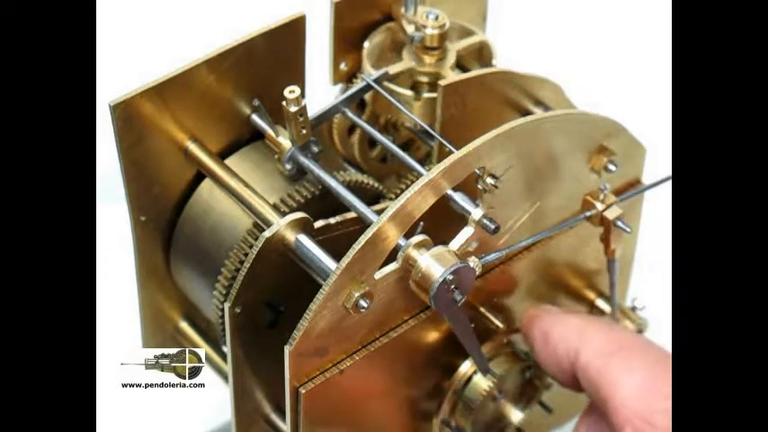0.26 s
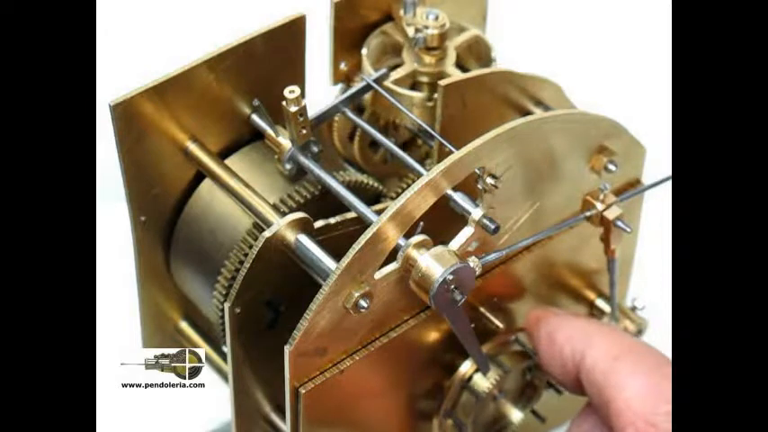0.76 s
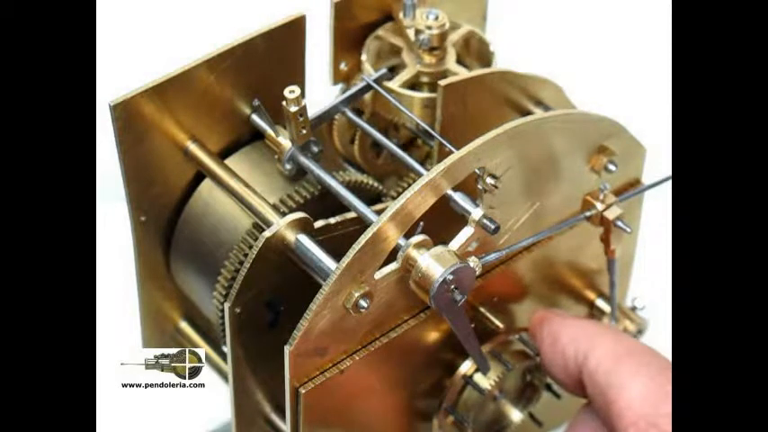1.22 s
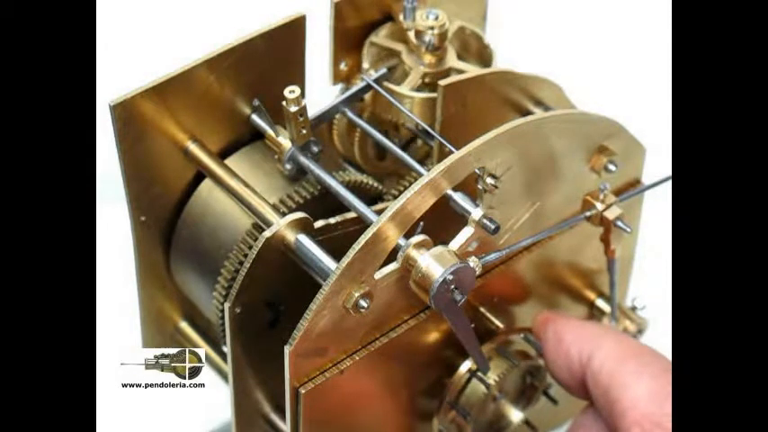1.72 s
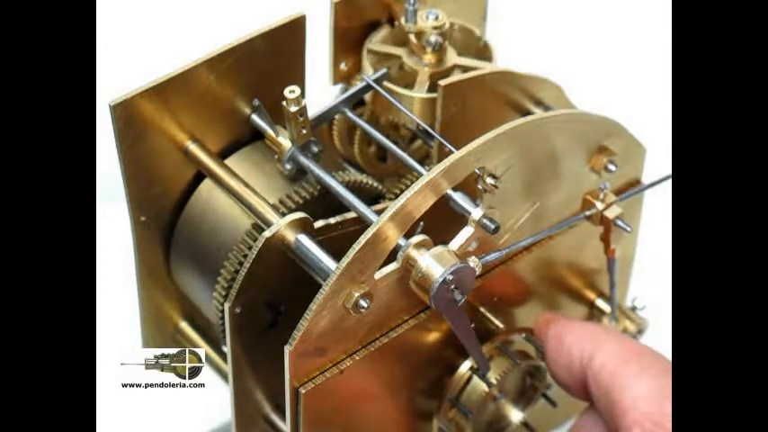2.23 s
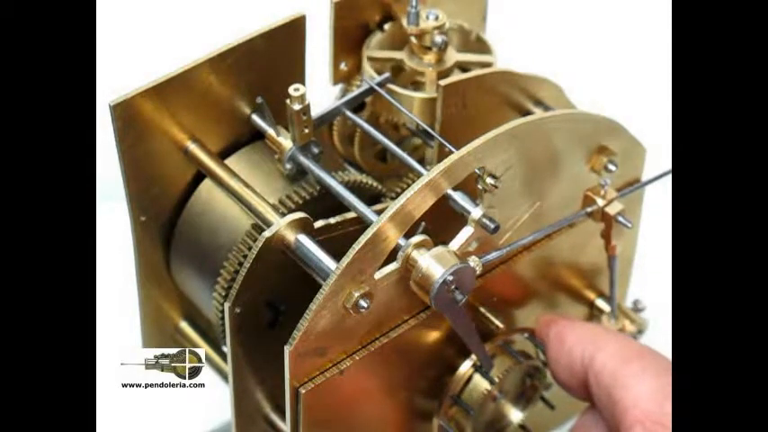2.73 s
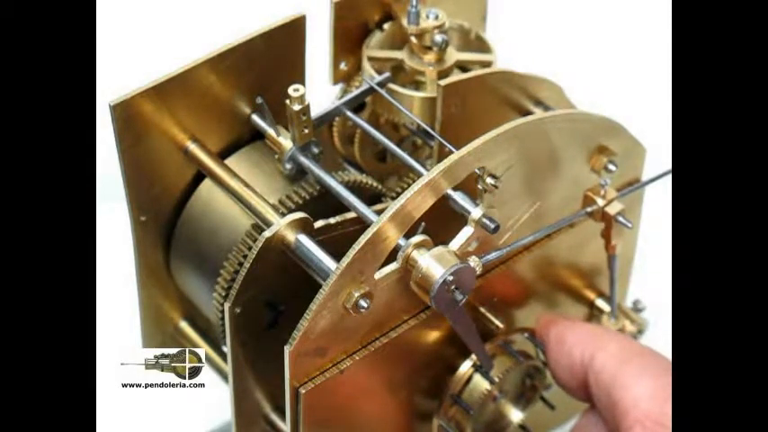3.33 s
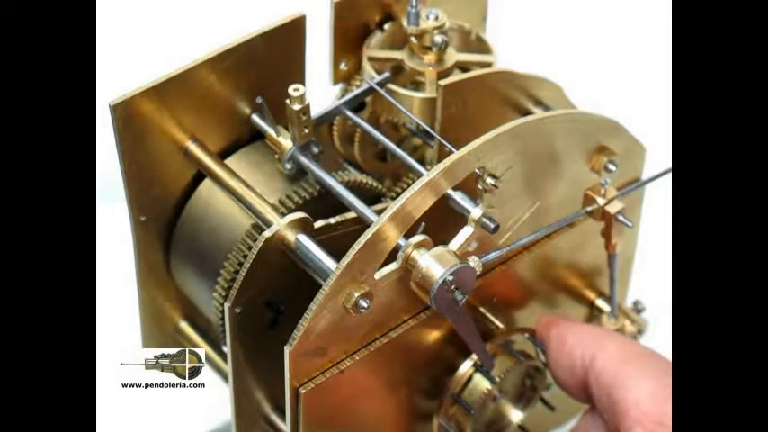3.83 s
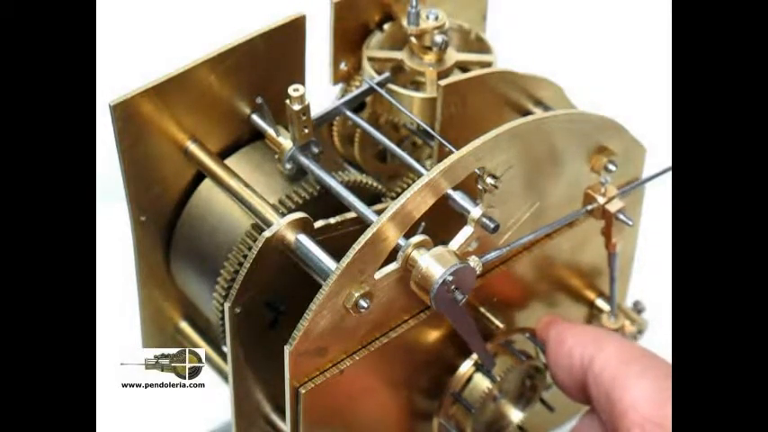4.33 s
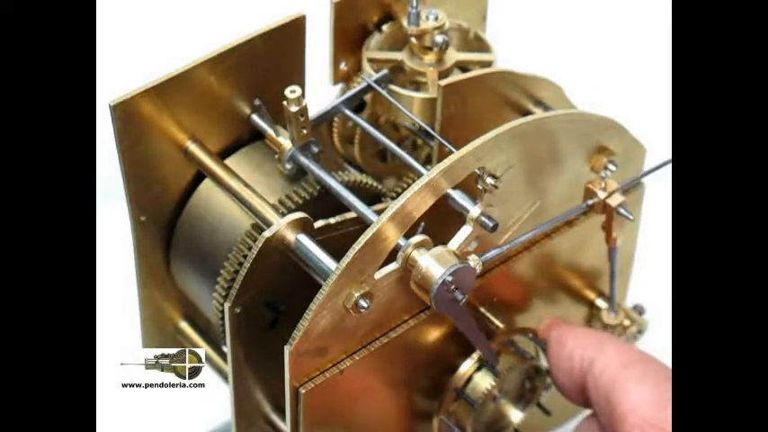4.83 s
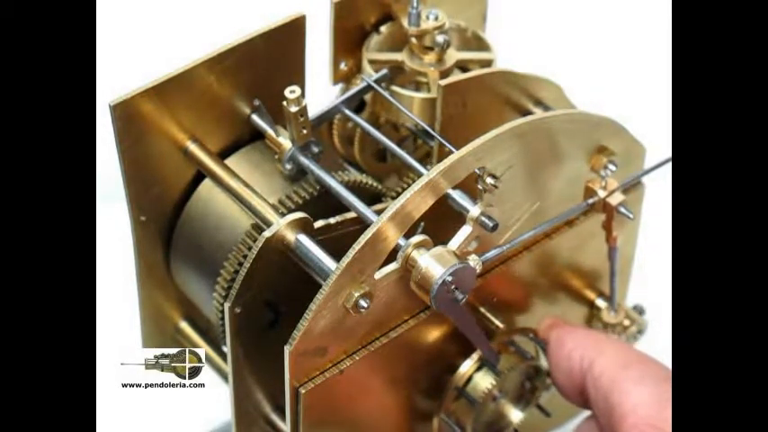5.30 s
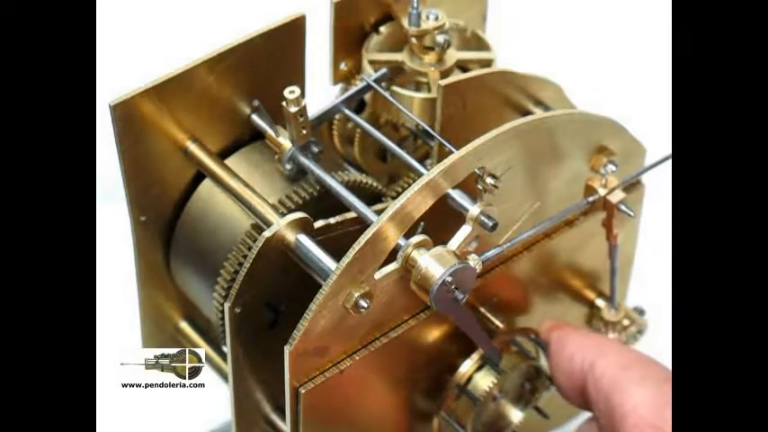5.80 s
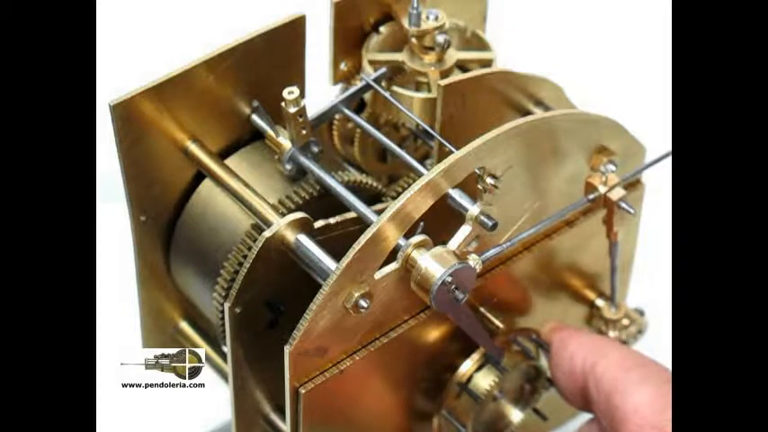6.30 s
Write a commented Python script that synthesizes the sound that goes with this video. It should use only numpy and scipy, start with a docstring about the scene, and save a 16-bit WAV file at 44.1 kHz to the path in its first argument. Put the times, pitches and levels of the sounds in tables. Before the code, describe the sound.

A brass clock movement is heard very close in a quiet room with soft air, faint hum and a thin high whine. From 0 to 2.1 seconds its gears whirr steadily, about forty bright tooth knocks a second over fine metallic chatter, gradually harder, with loose clacks strongest around 1.8 to 1.9. It stops quickly. Short ratchety spurts follow at 2.1, 2.4, 2.7 and, fainter, 3.0, clicks merging into buzz, with little rubs and knocks between. Near-quiet follows. At 4.1 a lever snaps by far the loudest, a dry bright crack with a high ping and short ring. From 4.25 the gears buzz, speeding up until a smaller crack at 4.73. Soft bright ticks fall around 2.1, 3.1, 5.1 and 6.1; low handling rumble swells gently near 1.1 and 4.35. Quiet room air remains to 6.5.

```python
"""A brass clock movement close to the microphone, over the faint air, hum and whine of a quiet room.
Its wheel train whirrs for two seconds: noise bursts, one per tooth, excite modelled plate resonances.
Then the wheels turn in four short spurts under a finger, tooth clicks merging into a buzz; parts rub and clack.
A lever snaps over (noise crack, sine ping, ringing modes); the train speeds up until it hits its stop.
From two seconds on, soft ticks of coloured noise fall on a one-second beat, four in all."""
import sys
import numpy as np
from scipy import signal
from scipy.fft import rfft, irfft, next_fast_len
from scipy.io import wavfile
from scipy.ndimage import uniform_filter1d

SR = 44100
rng = np.random.default_rng(int(sys.argv[2]) if len(sys.argv) > 2 else 0)


def transcribe(u):
    """Save the signal u as a 16-bit wav file named by the first command-line argument.

    u: samples, shape (n,) or (channels, n), limited to [-1, 1]; the rate is SR.
    q: integer samples, one column per channel.
    """
    v = np.clip(np.atleast_2d(u).T, -1, 1)
    q = np.round(v * 32767).astype(np.int16)
    wavfile.write(sys.argv[1], SR, q)


N = 288855
TIME = np.arange(N) / SR

# slow wheel in the free run: (time [s], speed [teeth/s])
RUN_SPEED = [(.02, 38.08), (.45, 40.2), (.9, 43.32), (1.5, 44.89), (1.8, 43.57), (2.08, 43.19)]
# relative spectrum of pinion chatter and clacks: (frequency [Hz], density [dB per Hz])
WHIRR_SPECTRUM = [(150, -32), (400, -30), (850, -5.5), (1400, -9.5), (2600, 3.5), (4100, -2), (4750, -6),
                  (5600, -3.5), (6400, -2.5), (7400, -0.5), (10200, 1), (12000, -6), (14500, -17),
                  (16000, -12)]


def amp(db):
    """Decibels to gain."""
    return 10 ** (np.asarray(db) / 20)


def unit(x):
    """x at rms 1."""
    return x / np.sqrt(np.mean(x ** 2) + 1e-20)


def along(points, hz):
    """(Hz, value) points read on a log frequency axis."""
    f, v = np.transpose(points)
    return np.interp(np.log(hz + 1), np.log(f + 1), v)


def curves(rows):
    """One value per sample for each column after the time."""
    s, *cols = np.transpose(rows)
    return [np.interp(TIME, s, c) for c in cols]


def fade(t, t60):
    """A decay of 60 dB in t60 seconds, silent before t = 0."""
    return (t >= 0) * amp(-60 * np.maximum(t, 0) / t60)


def swell(s, length):
    """A rounded rise and fall of the given length, at its top at time s."""
    return np.cos(np.pi * np.clip((TIME - s) / length, -.5, .5))


def filtered(x, response):
    """x through a complex frequency response, zero-padded."""
    size = 2 * next_fast_len(N // 2 + SR // 4)
    return irfft(rfft(x, size) * response(np.fft.rfftfreq(size, 1 / SR)), size)[:N]


def colour(points, hz):
    """A causal (minimum-phase) response with the given spectrum, normalised in power."""
    cepstrum = irfft(np.log(unit(amp(along(points, hz)))))
    half = len(cepstrum) // 2
    cepstrum[1:half] *= 2
    cepstrum[half + 1:] = 0
    return np.exp(rfft(cepstrum))


def resonance(hz, centre, width):
    """A causal resonance with a peak gain of 1."""
    return 1j * hz * width / (centre ** 2 - hz ** 2 + 1j * hz * width)


def narrow(centre, width, size):
    """size samples of noise of rms 1 with steep skirts around one pitch."""
    hz = np.fft.rfftfreq(size, 1 / SR)
    spectrum = rfft(rng.standard_normal(size)) * resonance(hz, centre, width) ** 2
    return unit(irfft(spectrum, size))


def brass(force, spectrum, ring_db):
    """Contact forces heard directly and through the ringing plates, at unchanged power."""
    # plate resonances: (frequency [Hz], width [Hz], relative level [dB])
    plates = [(857, 61, 6), (1105, 72, -2), (1318, 83, -2), (1787, 89, 3), (2204, 19, 0), (2320, 36, -6),
              (2647, 46, 0), (3430, 95, -3), (3800, 97, -4), (4210, 130, -2.5), (5410, 140, -1),
              (5820, 170, 0.5), (6460, 47, -10), (7010, 71, 0.5), (7210, 290, -3.5), (7610, 78, -5),
              (7830, 48, -7), (8320, 52, -4), (9200, 43, -6), (9470, 340, -9), (13900, 300, -18),
              (14100, 270, 3)]

    def response(hz):
        modes = sum(amp(db) * resonance(hz, centre, width) for centre, width, db in plates)
        body = colour(spectrum, hz) * (1 + amp(ring_db) * modes)
        return body / np.sqrt(np.mean(np.abs(body) ** 2))
    return filtered(force, response)


def teeth(speed, contact_t60, scatter_db, rise_t60):
    """Force of rms 1 from a turning wheel: each tooth lands with its own strength."""
    start, end = speed[0][0], speed[-1][0]
    turning = (TIME >= start) & (TIME < end)
    rate, = curves(speed)
    passed = np.cumsum(rate * turning) / SR
    tooth = passed.astype(int)
    age_s = passed % 1 / rate
    strength = amp(scatter_db * rng.standard_normal(tooth[-1] + 1))[tooth]
    pulse = fade(age_s, contact_t60) * (1 - fade(age_s, rise_t60))
    landing = turning * strength * pulse
    rms = np.sqrt(np.mean(landing[turning] ** 2))
    return landing / rms * rng.standard_normal(N)


def chatter(rate, t60, scatter_db):
    """Force of rms 1 from many tiny irregular contacts, rate per second, their powers adding."""
    hits = (rng.random(N) < rate / SR) * amp(2 * scatter_db * rng.standard_normal(N))
    power = signal.lfilter([1], [1, -fade(1 / SR, t60) ** 2], hits)
    return unit(np.sqrt(power) * rng.standard_normal(N))


def wander(x, depth_db):
    """As the wheels turn, the contact points move and favour other resonances."""
    z = signal.stft(x, nperseg=512)[2]
    field = rng.standard_normal(z.shape)
    field = uniform_filter1d(field, size=3, axis=0)  # over frequency
    field = uniform_filter1d(field, size=14, axis=1)  # over time
    return signal.istft(z * amp(depth_db * unit(field)), nperseg=512)[1][:N]


def background():
    """Room air as shaped noise; a faint hum and a thin electronic whine as steady sines."""
    # air: (frequency [Hz], relative level [dB])
    air_spectrum = [(20, -2.5), (60, -19.5), (85, -5.5), (125, -9.5), (170, -10), (290, -10.5),
                    (550, -11.5), (2000, -17), (4800, -20.5), (6500, -22.5), (7400, -21), (8500, -23.5),
                    (16000, -33)]
    # electrical tones: (frequency [Hz], rms level [dB])
    tone_rows = [(52, -74), (99, -80), (121, -79.5), (5880, -67)]
    air = unit(filtered(rng.standard_normal(N), lambda hz: amp(along(air_spectrum, hz))))
    tones = sum(amp(db) * np.sqrt(2) * np.sin(2 * np.pi * hz * TIME) for hz, db in tone_rows)
    return amp(-61.5) * air + tones


def handling():
    """The hand rests on the frame; each press swells its low noise rumble through the table."""
    # presses: (centre time [s], length [s], peak rumble added [dB])
    press_rows = [(.1, .7, -70), (1.1, .5, -65), (3.203, .4, -73), (4.35, 0.97, -63.5)]
    # rumble: (frequency [Hz], relative density [dB per Hz])
    rumble_spectrum = [(10, 2.5), (25, 5), (55, 1), (100, -21), (250, -12.5), (1000, -80)]
    resting_db = -71.5
    pressure = amp(resting_db) + sum(amp(db) * swell(s, length) for s, length, db in press_rows)
    rumble = filtered(rng.standard_normal(N), lambda hz: amp(along(rumble_spectrum, hz)))
    return pressure * unit(rumble)


def ticks():
    """A soft, bright tick: a noise burst with a rounded onset and a short scraping decay."""
    # ticks: (time [s], level before the onset shape [dB])
    tick_rows = [(2.128, -51), (3.122, -47), (5.125, -50), (6.127, -50)]
    # colour: (frequency [Hz], relative density [dB per Hz])
    tick_spectrum = [(1500, -12), (2400, -21), (3050, 1.5), (3600, -8), (4600, -13), (5500, 0), (7500, -3),
                     (8700, 4), (9600, 3.5), (11000, -17), (15000, -32)]
    force = sum(amp(db) * (fade(TIME - s, t60=0.17) - fade(TIME - s, t60=0.012)) for s, db in tick_rows)
    return filtered(force * rng.standard_normal(N), lambda hz: colour(tick_spectrum, hz))


def clacks():
    """Loose parts knock on the plates as the train shakes them: decaying noise forces."""
    # clacks: (time [s], level [dB])
    clack_rows = [(0.494, -38.5), (0.671, -45), (1.182, -43), (1.205, -43), (1.631, -43), (1.747, -44),
                  (1.798, -32.5), (1.897, -31), (1.904, -54), (2.135, -42.5), (2.361, -51), (3.047, -48),
                  (4.328, -48)]
    force = sum(amp(db) * fade(TIME - s, t60=0.025) for s, db in clack_rows)
    return brass(force * rng.standard_normal(N), WHIRR_SPECTRUM, ring_db=0.5)


def rubs():
    """Arbors and levers rub on brass: each rub swells and fades, exciting one resonance in tiny slips."""
    # rubs: (centre time [s], length [s], pitch [Hz], width [Hz], level at the top [dB])
    rub_rows = [(1.993, 0.16, 2740, 895, -53), (2.23, 0.079, 8700, 250, -54),
                (2.242, .14, 1170, 352, -58.5), (2.302, 0.049, 1570, 800, -56.5),
                (2.419, 0.14, 3360, 1400, -54.5), (3.137, 0.096, 3120, 250, -64),
                (3.878, .03, 1900, 1200, -60), (4.359, 0.069, 640, 150, -62.5),
                (4.579, 0.27, 3400, 806, -60), (4.66, .14, 840, 79, -66)]
    out = np.zeros(N)
    for s, length, hz, width, db in rub_rows:
        touch = np.abs(TIME - s) < length / 2
        out[touch] += amp(db) * swell(s, length)[touch] * narrow(hz, width, size=SR)[:touch.sum()]
    slip_power = uniform_filter1d(chatter(rate=700, t60=0.011, scatter_db=1.5) ** 2, size=40)
    return out * unit(np.sqrt(np.abs(slip_power)))


def blows():
    """A lever cracks against a pin, which pings; it rebounds once and rings on in decaying modes."""
    # blows: (time [s], level [dB], ring re blow [dB], pin pitch [Hz], rebound t60 [s])
    blow_rows = [(4.0969, -13.5, -19.5, 7630, 0.076), (4.731, -27.5, -31, 6770, 0.038)]
    # lever modes: (frequency [Hz], mean relative level [dB], t60 [s])
    lever_modes = [(345, -16, .13), (1507, -13, .15), (1701, -12, .13), (1841, -12, .17), (2229, -9, .16),
                   (2692, -10, .2), (3262, -11, .24), (3450, -11, .2), (3820, -8, .2), (4188, -6, .21),
                   (4463, -12, .2), (4982, -11, .19), (5430, -7, .17), (5841, -4, .17), (7025, -6, .16),
                   (7305, -9, .2), (7483, -6, .18), (7593, -7, .19), (8005, 1, .19), (8147, -7, .17),
                   (8425, -9, .18), (9573, -9, .22), (10050, -11, .16), (10790, -13, .18)]
    # crack: (frequency [Hz], relative density [dB per Hz])
    snap_spectrum = [(100, -32), (300, -27), (700, -15), (1200, -15.5), (2600, -3.5), (4800, -3.5),
                     (5800, -0.5), (6500, -1), (7900, 7.5), (9000, -6), (9700, 1), (11000, -5.5),
                     (13000, -21), (16000, -34)]
    ping_db, rebound_delay_s, mode_scatter_db = -5.5, .0033, 0.44
    out = np.zeros(N + SR)
    t = TIME[:SR // 2]
    snap = colour(snap_spectrum, np.fft.rfftfreq(len(t), 1 / SR))
    for s, db, ring_db, pin_hz, rebound_t60 in blow_rows:
        contact = 0.68 * fade(t, t60=0.037) + .5 * fade(t - rebound_delay_s, rebound_t60)
        crack = irfft(rfft(contact * rng.standard_normal(len(t))) * snap)
        ping = fade(t, t60=.023) * np.sin(2 * np.pi * pin_hz * t)
        ping *= 1 + .4 * narrow(400, 700, size=len(t))
        ring = np.zeros(len(t))
        for hz, mean_db, t60 in lever_modes:
            gain = amp(mean_db + rng.normal(0, mode_scatter_db))
            ring += gain * fade(t, t60) * np.sin(2 * np.pi * (hz * t + rng.random()))
        blow = crack + amp(ping_db) * ping + amp(ring_db) * ring
        out[round(s * SR):][:len(t)] += amp(db) * blow * (1 - fade(t, t60=0.0035))
    return out[:N]


def mesh():
    """The fast pinion sings faintly: a sine whose pitch follows the speed of the train."""
    pinion_teeth_per_wheel_tooth = 17.5
    rate, = curves(RUN_SPEED)
    phase = 2 * np.pi * pinion_teeth_per_wheel_tooth * np.cumsum(rate) / SR
    level = amp(-75.5) * (TIME < RUN_SPEED[-1][0])
    return level * np.sin(phase) * (1 + 0.11 * narrow(27, 30, size=N))


def spurts():
    """Each push speeds the wheels up and makes them louder: single clicks merge into a sliding buzz."""
    # spurts: (time [s], length [s], push [s], speed at the start, after the push, at the end [teeth/s],
    #          level at reference speed before the click/buzz mix [dB], release [s])
    spurt_rows = [ (2.114, .216, .116, 38, 155, 67, -48.5, .09),
                  (2.361, .22, .101, 41, 178, 153, -48.5, .055), (2.69, .21, .077, 35, 144, 47, -52, .01),
                  (3.016, .22, .111, 32, 56, 69, -55.5, .03),
                  (4.242, .488, .096, 34, 60.5, 146.1, -51.5, .01), ]
    # click and buzz colours: (frequency [Hz], relative density [dB per Hz])
    click_spectrum = [(300, -19), (950, -7.5), (1800, -10.5), (2700, 3), (3500, 2), (4300, -1.5),
                      (4800, -8), (5400, -4), (6500, -7.5), (7500, -2.5), (10000, -3.5), (12000, -15),
                      (14500, -39), (16000, -10)]
    slide_spectrum = [(300, -25), (950, -4), (1600, -5.5), (2700, 3), (4200, -8.5), (4800, -5), (5400, -2),
                      (6800, -4), (8500, -1.5), (10200, 0.5), (12000, -6), (14500, -13), (16000, -20)]
    reference_teeth_per_s, db_per_doubling, release_db = 100, 2, 10.5
    landing, sliding = np.zeros(N), np.zeros(N)
    for s, length, push, start_rate, pushed_rate, end_rate, db, release in spurt_rows:
        end = s + length
        speed = [(s, start_rate), (s + push, pushed_rate), (end, end_rate)]
        rate, = curves(speed)
        released = np.clip(1 - (end - TIME) / release, 0, 1)
        speed_db = db_per_doubling * np.log2(rate / reference_teeth_per_s)
        gain = amp(db + speed_db - release_db * released) * (TIME >= s) * (TIME < end)
        slide = np.clip(rate / 230, 0, .9)
        clicks = teeth(speed, contact_t60=0.022, scatter_db=3, rise_t60=0.00085)
        landing += gain * (1 - slide ** 2) * clicks
        sliding += gain * slide
    sliding *= chatter(rate=1700, t60=0.0037, scatter_db=4.5)
    click_sound = brass(landing, click_spectrum, ring_db=7.5)
    buzz = brass(sliding, slide_spectrum, ring_db=-3.5)
    return amp(-2.0) * click_sound + amp(-0.6) * buzz


def free_run():
    """The slow wheel knocks tooth by tooth, ever harder, while the fast pinions chatter in their play."""
    # knock: (frequency [Hz], relative density [dB per Hz])
    knock_spectrum = [(300, -10.5), (850, -16.5), (1800, -4.5), (4000, -3), (4800, -3), (6400, -4.5),
                      (7400, 4.5), (8400, 4), (9500, -7.5), (12000, -4), (16000, -50)]
    whirr_db, knock_start_db, knock_growth_db_per_s = -50, -54.5, 3
    whirr_lead_s = 0.044  # pinions begin to slacken this long before the slow wheel stops
    knock_db = knock_start_db + knock_growth_db_per_s * TIME
    driven = fade(np.maximum(TIME - RUN_SPEED[-1][0] + whirr_lead_s, 0), t60=0.17)
    pinions = brass(chatter(rate=750, t60=0.01, scatter_db=0.0), WHIRR_SPECTRUM, ring_db=4.5)
    knocks = teeth(RUN_SPEED, contact_t60=0.017, scatter_db=0.5, rise_t60=0.0042)
    wheel = brass(knocks, knock_spectrum, ring_db=13.5)
    return driven * amp(whirr_db) * wander(pinions, depth_db=1.5) + amp(knock_db) * wheel


def room(x):
    """A short diffuse tail of noise in which each frequency dies at its own speed."""
    # decay: (frequency [Hz], t60 [s])
    room_decay = [(200, 0.88), (2500, 0.33), (8000, .23), (14000, 0.32)]
    hz, t, z = signal.stft(rng.standard_normal(SR // 2), SR, nperseg=256)
    tail = signal.istft(z * fade(t, along(room_decay, hz)[:, None]), SR, nperseg=256)[1]
    tail *= 1 - fade(TIME[:len(tail)], t60=0.0036)
    return signal.fftconvolve(x, tail / np.linalg.norm(tail))[:N]


def scene():
    """The movement, its room and the background."""
    train = free_run() + mesh() + spurts() + rubs() + clacks() + ticks()
    levers = blows()
    reverb = room(amp(-6.0) * train + amp(-9.5) * levers)
    return (train + levers + reverb + handling() + background())[None]


def record(dry):
    """The microphone has a narrow null in the high treble; nothing passes above the band limit."""
    null_hz, width_hz, top_hz = 11800, 550, 15900

    def response(hz):
        offset = (hz - null_hz) ** 2
        null = offset / (offset + width_hz ** 2) * 0.89 + 0.12
        return null * (hz < top_hz)
    return filtered(dry[0], response)[None]


dry = scene()
out = record(dry)
transcribe(out)
```